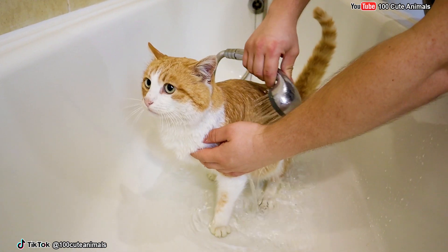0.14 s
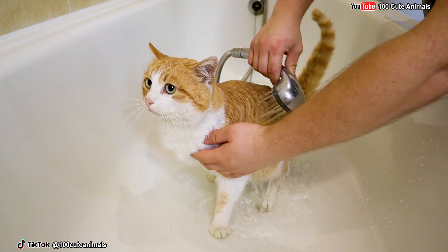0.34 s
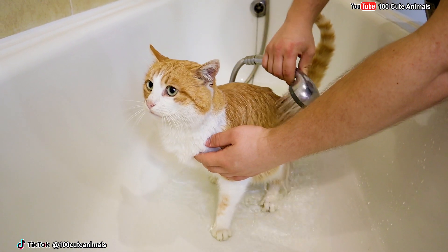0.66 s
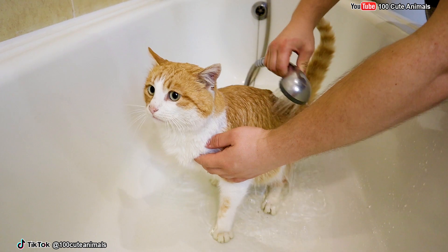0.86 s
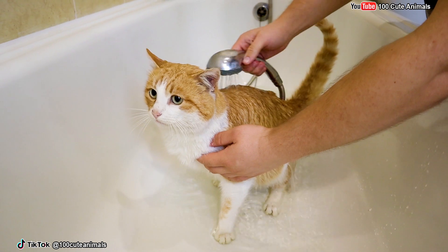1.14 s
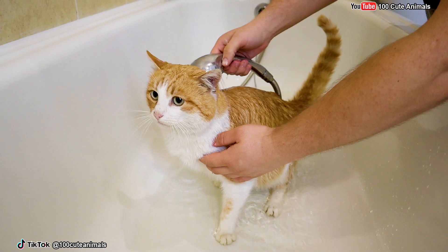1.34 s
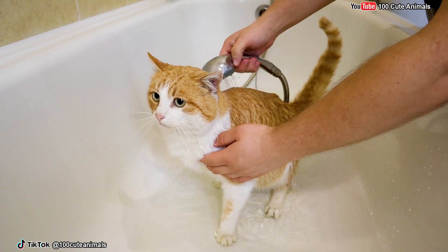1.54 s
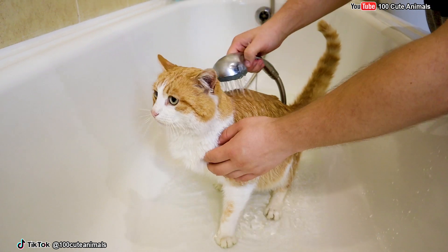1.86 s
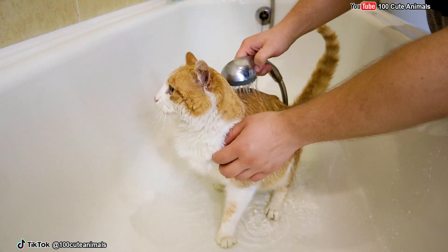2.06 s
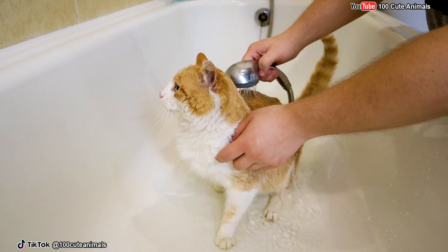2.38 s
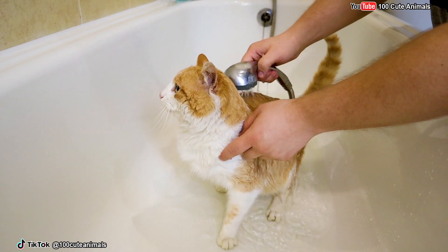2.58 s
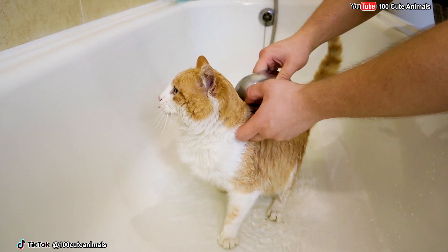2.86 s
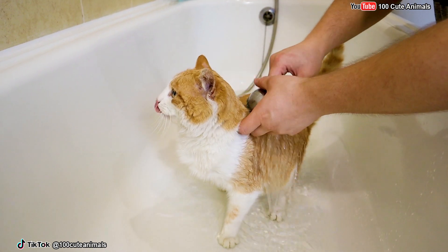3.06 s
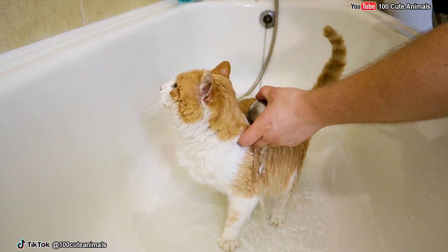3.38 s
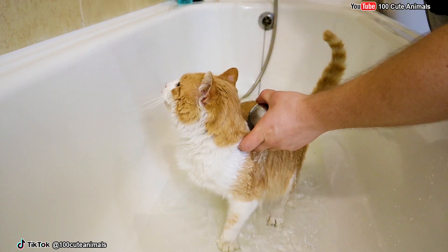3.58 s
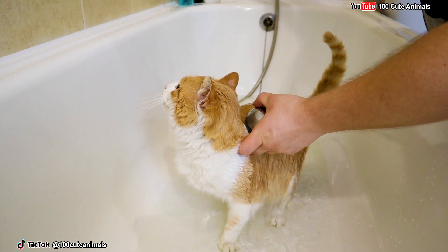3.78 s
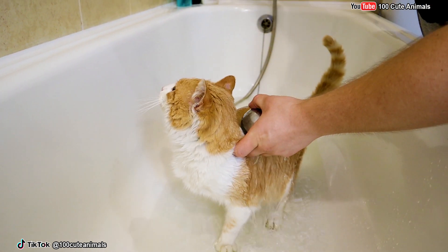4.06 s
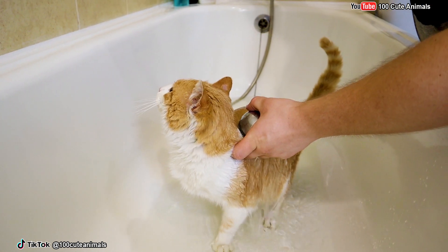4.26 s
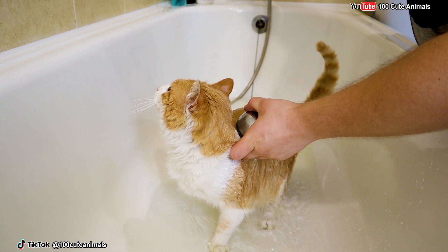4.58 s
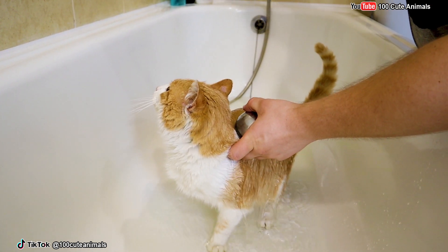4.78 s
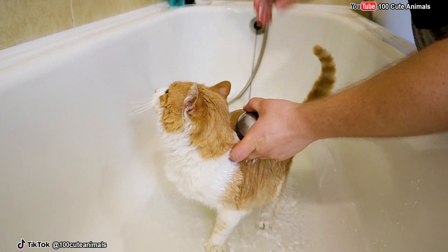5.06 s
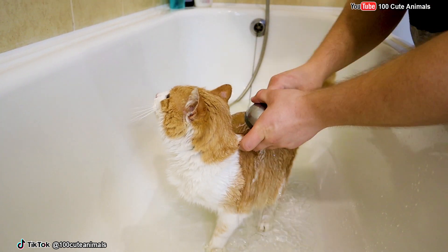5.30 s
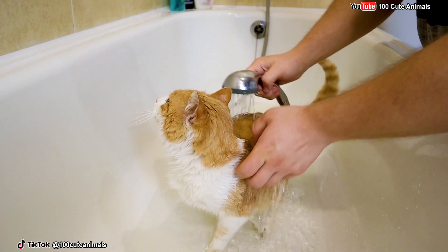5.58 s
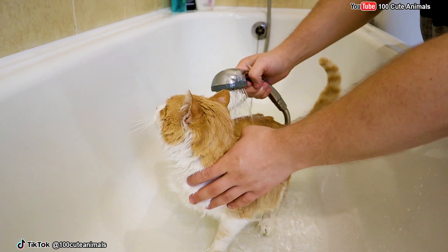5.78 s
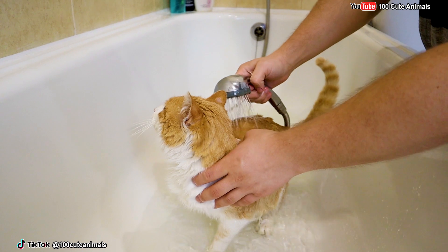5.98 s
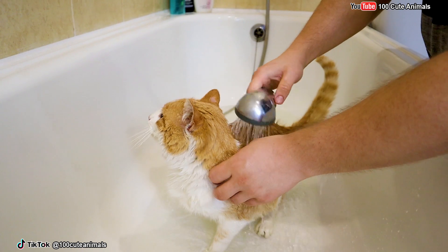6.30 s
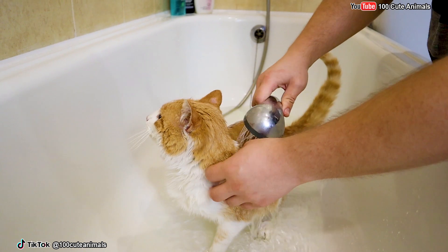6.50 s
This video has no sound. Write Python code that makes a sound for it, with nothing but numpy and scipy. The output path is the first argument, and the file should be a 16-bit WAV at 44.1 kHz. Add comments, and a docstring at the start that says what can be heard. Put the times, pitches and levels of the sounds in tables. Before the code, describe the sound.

A hand shower hisses steadily onto a cat's wet fur in a bathtub, with droplets pattering, run-off trickling and small hollow splashes up close.

```python
"""A steady hiss of water opens the scene: a hand shower rinses a cat in a bathtub, heard close up in stereo.
Filtered noise makes the hiss of the jets on wet fur. Showers of short, dying tones make the spatter of
droplets and the trickle and gulps of run-off in shallow water. Single drops snap as a crack of noise plus
a tiny bubble, large bubbles ring alone, and the tub booms, rings hollow and echoes."""
import sys
import numpy as np
from scipy import signal
from scipy.fft import rfft, irfft, next_fast_len
from scipy.io import wavfile
from scipy.ndimage import map_coordinates

SR = 44100
rng = np.random.default_rng(int(sys.argv[2]) if len(sys.argv) > 2 else 0)


def inscribe(sig):
    """Save sig as 16-bit PCM at rate SR to the path in sys.argv[1].

    A 1-D sig is mono; a 2-D sig holds one channel per row.
    Samples are clipped to [-1, 1] before scaling.
    """
    pcm = np.round(np.clip(np.atleast_2d(sig).T, -1, 1) * 32767)
    wavfile.write(sys.argv[1], SR, pcm.astype(np.int16))


N = 292824  # length of the scene [samples]


def amp(db):
    """Turn decibels into a gain."""
    return 10 ** (np.asarray(db) / 20)


def unit(x):
    """Scale a sound to an rms of 1."""
    return x / np.sqrt(np.mean(x ** 2) + 1e-20)


def along(points, hz):
    """Read a curve of (frequency [Hz], value) points, joined by straight lines on a log frequency axis."""
    f, v = np.transpose(points)
    return np.interp(np.log(hz + 1), np.log(f + 1), v)


def curves(rows):
    """Join the points of each column after the time into one value per sample."""
    seconds, *columns = np.transpose(rows)
    return [np.interp(np.arange(N) / SR, seconds, column) for column in columns]


def wobble(rate):
    """Draw a smooth random curve through `rate` random points a second."""
    points = rng.standard_normal(int(N * rate / SR) + 4)
    return map_coordinates(points, [np.arange(N) * rate / SR])


def noise():
    """Two independent channels of white noise, as long as the scene."""
    return rng.standard_normal((2, N))


def filtered(x, response):
    """Multiply the spectrum of x by a response, given as a function of frequency."""
    size = next_fast_len(N + SR // 2)
    hz = np.fft.rfftfreq(size, 1 / SR)
    return irfft(rfft(x, size) * response(hz), size)[..., :N]


def coloured(x, spectrum):
    """Filter x by a curve of (frequency [Hz], gain [dB]), then scale it to an rms of 1."""
    return unit(filtered(x, lambda hz: amp(along(spectrum, hz))))


def add(track, s, sound):
    """Mix a sound into a track from time s [s]."""
    start = max(round(s * SR), 0)
    part = sound[:, :max(N - start, 0)]
    track[:, start:start + part.shape[1]] += part


def swells(rows, attack_s, fall_db_per_s):
    """Joint loudness of (time [s], level [dB], length [s]) events: each rises, holds until its length, dies."""
    t = np.arange(N) / SR
    power = np.zeros(N)
    for s, db, length in rows:
        rise = np.clip((t - s) / attack_s, 0, 1)
        fall_db = fall_db_per_s * np.maximum(t - s - length, 0)
        power += (rise * amp(db - fall_db)) ** 2
    return np.sqrt(power)


def bubbles(times, hz, gain, cycles, rise, size, count, attack=0.56):
    """Trapped air rings as a dying tone that may climb; attack and life are in cycles, size and count in samples."""
    phase = hz[:, None] * np.arange(size) / SR  # cycles at the starting pitch
    age = phase / cycles  # 1 at 60 dB down
    ring = gain[:, None] * amp(-60 * age) * (1 - np.exp(-phase / attack))
    angle = 2 * np.pi * phase * (1 + rise * np.minimum(age, 1) / 2)
    at = ((times * SR).astype(int)[:, None] + np.arange(size)).ravel()
    lead = rng.choice([-1, 1], (len(hz), 1))  # each leads in the left or the right channel
    mid, side = ring * np.sin(angle), lead * ring * np.cos(angle)
    return np.array([np.bincount(at, part.ravel(), count)[:count] for part in (mid, side)])


def burst(low_hz, high_hz, life, size):
    """Water cracks on a surface: a band of noise, 60 dB down after life [s], of size [samples]."""
    edges = [min(low_hz, SR / 8), min(high_hz, SR / 3)]
    band = signal.butter(3, edges, "band", fs=SR, output="sos")
    fade = amp(-60 * np.arange(size) / SR / life)
    return signal.sosfilt(band, rng.standard_normal((2, size)) * fade)


# how long the room rings at each pitch: (frequency [Hz], time to fall 60 dB [s])
ECHO_TIME = [(200, 0.16), (700, 0.29), (2000, 0.31), (6000, 0.15), (14000, 0.01)]


def echoed(x, wet_db, wall_db, wall_s=.012):
    """Near tub walls send back quick copies and the bathroom a fading tail, drawn anew at each call."""
    hz, t, z = signal.stft(rng.standard_normal((2, SR // 5)), SR, nperseg=256)
    fade = amp(-60 * t / along(ECHO_TIME, hz)[:, None])
    tail = signal.istft(z * fade, SR, nperseg=256)[1]
    answer = amp(wet_db) * tail / np.linalg.norm(tail[0])
    delays = rng.uniform(.001, np.clip(wall_s, .002, .05), size=(2, 8))
    bounces = rng.standard_normal(delays.shape) / np.sqrt(delays.shape[1])
    answer[np.arange(2)[:, None], (delays * SR).astype(int)] += amp(wall_db) * bounces
    answer[:, 0] += 1  # the direct sound
    return signal.fftconvolve(x, answer, axes=1) / np.sqrt(np.sum(answer ** 2) / 2)


def in_tub(x, wet_db, wall_db):
    """Echo a long sound in fifths of a second, with new echoes each time as the water lands in new places."""
    out = np.zeros((2, N))
    for start in range(0, N, SR // 5):
        add(out, start / SR, echoed(x[:, start:start + SR // 5], wet_db, wall_db))
    return out


# the tub's hollow resonances: (centre [Hz], width [Hz], gain [dB])
TUB_MODES = [(171, 65, -5.5), (281, 27.7, 3), (373.4, 13.4, 3), (526, 22, 5), (611, 21, 2.5),
             (646, 17, -0.5), (784, 16, 7.5), (1006, 31, 9)]


def tub(hz):
    """The hollow shell favours a few pitches: a sum of resonances with alternating signs."""
    total = 0
    for k, (centre, width, db) in enumerate(TUB_MODES):
        resonance = 1j * hz * width / (centre ** 2 - hz ** 2 + 1j * hz * width)
        total = total + (-1) ** k * amp(db) * resonance
    return total


# the jets landing, muffled while the shower head is buried in the fur: (time [s], level [dB])
SPRAY_LEVEL = [(0, -33), (.65, -33.5), (1.1, -34.5), (1.3, -40), (1.65, -32.5), (2.05, -35), (2.25, -33.5),
               (2.6, -35), (3.2, -35.5), (4.15, -33), (4.45, -38), (4.7, -48), (5.3, -40.5), (5.7, -37),
               (5.9, -39.5), (6.15, -36), (6.38, -37), (6.64, -33.5)]
# colour of the jets landing: (frequency [Hz], gain [dB])
SPRAY_COLOUR = [(400, -23), (900, -12.5), (1300, 6.5), (2200, 1), (3000, 3.5), (4300, 3), (5400, 1),
                (7000, 0), (8600, -3), (10200, 0), (11300, 0.5), (12200, -3), (12600, -1.5), (15500, -16)]
# colour of the jets leaving the nozzles: (frequency [Hz], gain [dB])
NOZZLE_COLOUR = [(900, -13), (1400, -16), (2150, 11), (3200, -35), (4300, 0.5), (5200, -7.5), (6100, 0.5),
                 (7000, -1.5), (8000, -1), (9000, -7), (10100, -22), (10850, -3), (11150, 5.5),
                 (11500, -0.5), (12200, -1), (13000, -22)]
# fine mist while the shower head is raised or turned: (time [s], level [dB], length [s])
FIZZ_EVENTS = [(0.78, -39, 0.32), (3.03, -38.5, 0.041)]
# colour of the mist: (frequency [Hz], gain [dB])
FIZZ_COLOUR = [(5000, -25), (9000, 5), (14000, -3.5)]


def spray():
    """Jets hiss as noise: nozzles, a broader fluttering hiss on wet fur, and brief fizzes of mist."""
    level_db, = curves(SPRAY_LEVEL)
    nozzles = amp(-42.5) * coloured(noise(), NOZZLE_COLOUR)
    landing = coloured(noise() * amp(2.4 * wobble(900)), SPRAY_COLOUR)
    landing = amp(level_db + 1.97 * wobble(25)) * landing
    fizz = swells(FIZZ_EVENTS, attack_s=.02, fall_db_per_s=200) * coloured(noise(), FIZZ_COLOUR)
    flutter = amp(0.9 * wobble(70))
    return flutter * (nozzles + landing + fizz)


# stray droplets, few while the shower head is pressed into the fur: (time [s], level [dB])
SPATTER_LEVEL = [(0, -44), (.2, -46), (.33, -39), (.65, -38.5), (.95, -35), (1.3, -43), (1.85, -36),
                 (2.2, -43), (2.65, -36.5), (3.15, -42), (3.55, -41), (4.1, -46), (4.65, -50), (5.3, -44.5),
                 (5.6, -38), (5.75, -43), (5.9, -65), (6.64, -46)]
# filter on the droplets' ticks: (frequency [Hz], gain [dB])
SPATTER_COLOUR = [(600, -36), (1500, 4), (2800, 8), (4200, 8), (7000, 4), (9000, -1), (11800, -1),
                  (12800, -8), (15500, -20)]
# droplets thrown up by a near drop: level relative to its crack [dB], length [s], dying away [dB/s]
SHOWER_DB, SHOWER_S, SHOWER_FALL_DB_PER_S = -16.5, 0.032, 148


def spatter(count=1300):
    """Droplets of all sizes tick as very short tones on enamel and water; each near drop throws up more."""
    level_db, = curves(SPATTER_LEVEL)
    thrown = [(s, crack_db + SHOWER_DB, SHOWER_S) for s, _, _, crack_db in NEAR_DROPS]
    showers = swells(thrown, attack_s=0.0027, fall_db_per_s=SHOWER_FALL_DB_PER_S)
    when, pitch, weight = rng.random((count, 3)).T
    hz = 1500 * 8 ** pitch
    gain = amp(np.minimum(-5 * np.log(1 - weight), 11.5)) * np.sqrt(hz)
    ticks = bubbles(when * N / SR, hz, gain, cycles=10, rise=0, size=220, count=N, attack=3)
    ticks = in_tub(ticks, wet_db=-9, wall_db=-5)
    ticks = coloured(ticks * amp(2.5 * wobble(40)), SPATTER_COLOUR)
    return np.hypot(amp(level_db), showers) * ticks


# water running off the fur, before any trim or offset: (time [s], level [dB])
RUNOFF_LEVEL = [(0, -32), (.27, -28), (.62, -38.5), (.92, -31.5), (1.35, -37.5), (1.6, -31.5), (1.92, -27),
                (2.15, -33), (2.92, -32), (3.25, -32), (3.7, -30.5), (4.1, -36.5), (4.85, -40.5),
                (5.6, -35), (5.92, -45.5), (6.15, -36.5), (6.45, -35.5), (6.64, -33)]
# filter on the small bubbles: (frequency [Hz], gain [dB])
TRICKLE_COLOUR = [(300, -44), (700, -41), (950, -9.5), (1300, 0), (2200, 0), (2800, 1.5), (4000, 6.5),
                  (8000, -28), (14000, -55)]


def trickle(count=2400):
    """Run-off beats small ringing bubbles into the shallow water, in uneven spurts."""
    flow_db, = curves(RUNOFF_LEVEL)
    jitter, weight = rng.random((2, count))
    when = (np.arange(count) + 2 * jitter) / count  # share of the scene
    hz = np.clip(1650 * np.exp(0.3484 * rng.standard_normal(count)), 700, 3600)
    gain = amp(np.minimum(-4.5 * np.log(1 - weight), 10))  # many faint, few loud
    plinks = bubbles(when * N / SR, hz, gain, cycles=24.7, rise=0.096, size=900, count=N)
    plinks = coloured(in_tub(plinks, wet_db=-4, wall_db=-2.5), TRICKLE_COLOUR)
    return amp(flow_db - 0.5 + 1.2 * wobble(23.91)) * plinks


# heavy water lands on the tub's floor and makes it boom: (time [s], level [dB], length [s])
FLOOR_THUMPS = [(1.57, -52, 0.16), (1.85, -54, 0.028), (2.052, -41, 0.047), (2.305, -43.5, 0.071),
                (2.8, -51.5, 0.11), (3.41, -49, 0.029), (3.93, -53, 0.11), (4.235, -45, 0.03),
                (5.59, -47, .03)]
# slops knock on the tub's side and ring it hollow: (time [s], level [dB], length [s])
SIDE_SLOPS = [(1.6, -54, 0.089), (2.31, -47, 0.04), (2.85, -49, 0.13), (3.26, -42.5, 0.038),
              (3.99, -44, .03), (4.23, -35.5, 0.03), (4.87, -50, 0.041), (5.75, -44, 0.06),
              (5.95, -38, 0.039), (6.085, -41, 0.063), (6.28, -48, 0.031), (6.475, -37.5, 0.14)]
# colour of the boom: (frequency [Hz], gain [dB])
BOOM_COLOUR = [(20, -66), (40, -46), (54, -29), (65, 1.5), (75, -1), (110, 1.5), (160, -32), (400, -65)]
KNOCK_ATTACK_S, BOOM_FALL_DB_PER_S, RING_FALL_DB_PER_S = 0.0059, 220, 222  # the shell's rise and dying away
BOOM_BED_DB = -64  # the steady drumming of the jets, before a random wobble
FLOOR_HZ, FLOOR_DB = 65.3, -4.5  # the floor's lowest mode, before a slow drift; relative to the rest of the boom
RING_BED_DB = -20.5  # the steady hollow ring, relative to the run-off table


def shell():
    """Falling water shakes the tub: noise through its resonances, soft throughout, strong at thumps and slops."""
    flow_db, = curves(RUNOFF_LEVEL)
    thumps = swells(FLOOR_THUMPS, KNOCK_ATTACK_S, BOOM_FALL_DB_PER_S)
    slops = swells(SIDE_SLOPS, KNOCK_ATTACK_S, RING_FALL_DB_PER_S)
    booming = np.hypot(amp(BOOM_BED_DB + 2.5 * wobble(25)), thumps)
    ringing = np.hypot(amp(flow_db + RING_BED_DB), slops)
    floor_mode = np.sin(2 * np.pi * FLOOR_HZ * np.arange(N) / SR + 2.0 * wobble(6.2))
    boom = unit(coloured(noise(), BOOM_COLOUR) + amp(FLOOR_DB) * floor_mode)
    ring = unit(filtered(noise() * amp(2.0 * wobble(40)), tub))
    return booming * boom + ringing * ring


SPLAT_S = 0.0047  # the time over which a drop's levels are counted [s]


def splat(x):
    """Give a short sound the energy of an rms of 1 held for SPLAT_S."""
    return x * np.sqrt(2 * SPLAT_S * SR / np.sum(x ** 2))


# the loudest near drops: (time [s], bubble level [dB], bubble starting pitch [Hz], crack level [dB])
NEAR_DROPS = [(0.0782, -28, 2870, -26.5), (0.2876, -33, 10500, -26), (0.3, -23.5, 4700, -32),
              (0.369, -28.5, 9600, -34), (0.4023, -23, 3580, -23), (0.4398, -30, 5730, -27.5),
              (0.4834, -24, 3550, -35), (0.7137, -20, 3790, -32), (0.731, -35, 3960, -29),
              (0.7677, -23.5, 2260, -33), (0.935, -28, 4670, -41), (1.0988, -27, 4300, -38),
              (1.4255, -25, 4940, -25.5), (1.814, -22, 6130, -34), (1.8553, -26, 7130, -24),
              (2.4438, -33.5, 8140, -33), (2.5584, -17, 3800, -34), (2.5854, -24.5, 4440, -28),
              (2.931, -27, 11500, -32), (3.309, -21.5, 3670, -38), (3.483, -29.5, 4000, -26),
              (3.778, -32, 2380, -34), (3.8139, -24.5, 7060, -25), (4.5717, -28, 2040, -34),
              (4.773, -26.5, 5550, -32), (5.095, -41, 6960, -33), (5.192, -33.5, 6240, -37),
              (5.364, -26.5, 6400, -28), (5.434, -29, 2620, -38), (5.4568, -37, 2800, -26),
              (5.4964, -27.5, 5400, -32), (5.531, -22.5, 2950, -23.5), (5.5368, -18.5, 3740, -38),
              (5.5481, -28, 3500, -40), (5.5746, -29.0, 6570, -29.5), (5.5944, -23.5, 3930, -44),
              (5.631, -27.5, 3870, -30), (5.647, -27, 6640, -30), (5.6803, -18.5, 3500, -28),
              (5.692, -29, 3900, -36), (5.7222, -17.5, 4000, -26), (5.7377, -25, 3640, -22),
              (5.936, -35, 5160, -29), (6.195, -31, 6760, -26), (6.426, -19.5, 4560, -24)]


def drops():
    """A near drop snaps: a crack of noise, coloured anew each time, and a tiny bubble that swells and dies."""
    out = np.zeros((2, N))
    t = np.arange(600) / SR
    swell = 1 - np.exp(-(t / .0008) ** 2)
    for s, bubble_db, hz, crack_db in NEAR_DROPS:
        ping = bubbles(np.zeros(1), np.array([hz]), np.ones(1), cycles=24, rise=.2, size=len(t), count=len(t))
        spectrum = rfft(burst(2000, 10000, life=.008, size=len(t)))
        places = np.linspace(0, 13, spectrum.shape[1])
        colour_db = 3.5 * map_coordinates(rng.standard_normal(14), [places])
        crack = irfft(spectrum * amp(colour_db)) * np.linspace(1, 0, len(t))
        drop = amp(bubble_db) * splat(ping * swell) + amp(crack_db) * splat(crack * swell)
        add(out, s, echoed(drop, wet_db=-7.5, wall_db=-10))
    return out


# single large bubbles, level before attack and echoes:
# (time [s], level [dB], starting pitch [Hz], life [cycles], pitch rise over that life [share])
LARGE_BUBBLES = [(0.177, -17, 1440, 120, 0), (0.768, -9, 1600, 23, 0.1), (0.967, -17, 1820, 55, 0.1),
                 (1.219, -14, 1535, 53, 0.035), (1.6366, -12, 1855, 95, 1.0), (1.6645, -13.5, 2315, 77, 0),
                 (1.866, -14.5, 1427, 80, 0.99), (2.112, -18, 820, 70, 0.18), (2.373, -17.5, 2190, 85, 1),
                 (3.565, -23, 602, 65, 0.14), (5.622, -20.5, 2214, 200, 0), (6.486, -16.5, 640, 47, 0.16)]


def plops():
    """One large bubble rings clean; in most, the pitch climbs as it nears the surface."""
    out = np.zeros((2, N))
    size = SR // 10
    for s, db, hz, cycles, rise in LARGE_BUBBLES:
        ring = bubbles(np.zeros(1), np.array([hz]), np.ones(1), cycles, rise, size=size, count=size, attack=0.93)
        add(out, s, amp(db) * echoed(ring, wet_db=-8, wall_db=-16.5))
    return out


# gushes that trap a cluster of air bubbles, level before a small trim and the tub's ring:
# (time [s], level [dB], leading bubble's starting pitch [Hz], nominal length [s])
GUSHES = [(0.222, -27, 1380, 0.062), (0.313, -29, 976, 0.055), (0.319, -44, 593, 0.096),
          (0.574, -28.5, 1670, 0.022), (0.811, -32, 1060, 0.077), (0.943, -38, 815, 0.048),
          (0.92, -30, 1414, 0.059), (1.078, -37, 780, 0.06), (1.114, -33.5, 2550, 0.096),
          (1.221, -25.5, 1390, 0.051), (1.406, -22.5, 2110, 0.02), (1.464, -24, 1600, 0.014),
          (1.584, -26.5, 1230, 0.092), (1.629, -27.5, 3100, 0.036), (1.656, -33, 988, 0.092),
          (1.749, -30.5, 1153, 0.074), (1.884, -25, 1950, 0.073), (2.083, -32, 547, 0.034),
          (2.103, -27, 850, 0.029), (2.128, -25, 2430, 0.017), (2.297, -32, 870, 0.037),
          (2.321, -31, 647, 0.06), (2.421, -26, 1420, 0.028), (2.648, -36, 657, 0.03),
          (2.776, -28.5, 1990, .035), (2.808, -31.5, 1027, 0.04), (2.883, -22.5, 1810, 0.016),
          (2.952, -33, 770, 0.039), (3.028, -26, 1650, .018), (3.121, -35, 804, 0.048),
          (3.474, -28, 1290, 0.087), (3.572, -31, 624, 0.036), (3.697, -30, 2600, 0.024),
          (3.859, -34, 1270, 0.05), (3.919, -41.5, 800, 0.041), (3.994, -31, 615, 0.031),
          (4.233, -33, 1470, 0.022), (4.234, -28, 1030, 0.034), (4.237, -34.5, 486, 0.04),
          (4.5, -36.5, 710, 0.038), (4.573, -28, 2030, 0.018), (4.829, -38, 2450, 0.06),
          (4.868, -31, 1200, 0.042), (4.87, -42, 490, 0.036), (4.985, -29.5, 1690, 0.033),
          (5.103, -32, 1700, 0.053), (5.153, -33.5, 980, 0.041), (5.429, -28, 2500, 0.023),
          (5.454, -33.5, 1275, 0.037), (5.461, -44.5, 540, 0.032), (5.685, -43, 690, 0.043),
          (5.733, -30.5, 654, 0.038), (5.779, -23, 1880, .042), (5.951, -23, 1444, 0.046),
          (5.953, -43.5, 282, 0.051), (6.08, -33, 555, 0.095), (6.119, -27, 1980, 0.048),
          (6.283, -28, 1373, 0.053), (6.284, -43.5, 242, 0.043), (6.461, -30, 2720, 0.019),
          (6.475, -24, 682, 0.053), (6.487, -26, 1260, 0.077), (6.529, -24.5, 2070, 0.016)]


def splashes(count=12):
    """Each gush slaps the water and traps a leading bubble, then others near its pitch; deep ones stay closest."""
    out = np.zeros((2, N))
    turn = np.linspace(0, 1, count)  # 0 is the leading bubble
    size = SR // 6
    for s, db, hz, length in GUSHES:
        times = length * turn * rng.uniform(.7, 1.3, count)
        chance = rng.standard_normal((2, count)) * (turn > 0)  # no chance in the leading bubble
        gain = amp(2.4 * chance[0] - 4.7 * turn + 1.3 * (turn == 0))
        spread = 0.12 * min(hz / 1400, 1) ** 0.3
        pitches = hz * np.exp(spread * chance[1])
        cluster = bubbles(times, pitches, gain, cycles=29.7, rise=0.066, size=2600, count=size, attack=0.84)
        slap = amp(-12) * unit(burst(.8 * hz, 4 * hz, life=3 * length, size=size))
        gush = echoed(unit(cluster) + slap, wet_db=-5, wall_db=-6)
        # the level counts as rms over the nominal length
        add(out, s, amp(db - 1.5) * gush * np.sqrt(2 * length * SR / np.sum(gush ** 2)))
    return out + amp(-12.5) * filtered(out, tub)  # the deep glugs ring on in the tub


# gain of the side signal, nearly mono in the bass and wide in the treble: (frequency [Hz], gain [dB])
SIDE_GAIN = [(60, -43), (180, -15), (350, -12), (700, -9), (1000, -5), (1400, -2), (2000, 2), (2500, 4.5),
             (5000, 5.5), (9500, 6.5), (14000, 6.5)]


def scene():
    """Add all the water as mid (shared) and side (opposed) signals, then turn them into left and right."""
    mid, side = spray() + spatter() + trickle() + shell() + drops() + plops() + splashes()
    side = filtered(side, lambda hz: amp(along(SIDE_GAIN, hz)))
    return np.array([mid + side, mid - side])


TOP_HZ = 15750  # nothing passes from here up


def record(dry):
    """The treble falls away above about 12 kHz and ends at TOP_HZ."""
    treble = [(12100, 0.0), (12400, -3.5), (15500, -18.0)]  # (frequency [Hz], gain [dB])
    return filtered(dry, lambda hz: amp(along(treble, hz)) * (hz < TOP_HZ))


dry = scene()
out = record(dry)
inscribe(out)
```